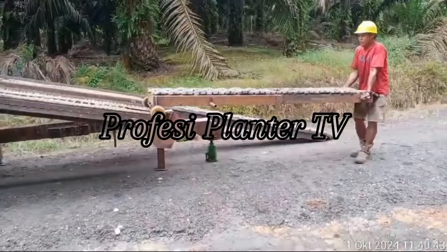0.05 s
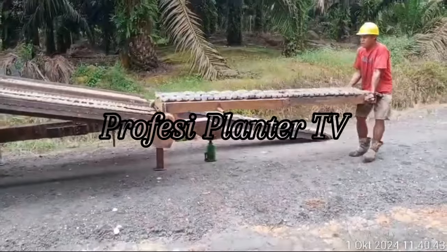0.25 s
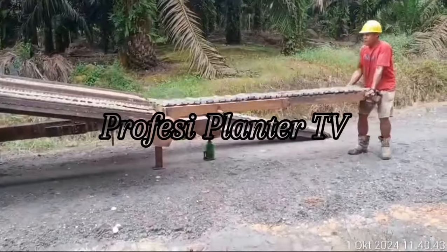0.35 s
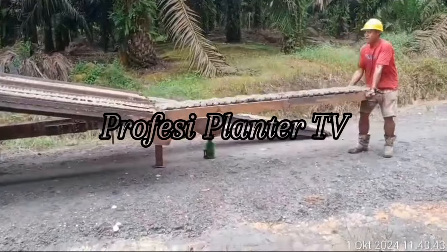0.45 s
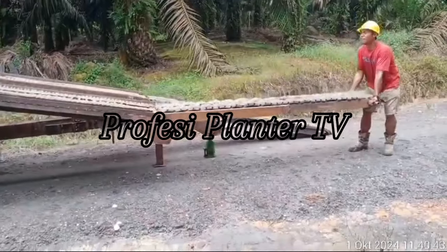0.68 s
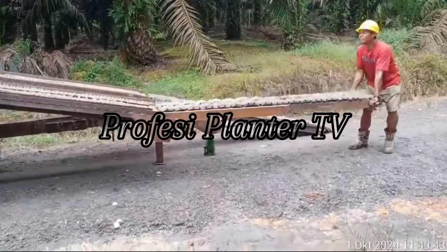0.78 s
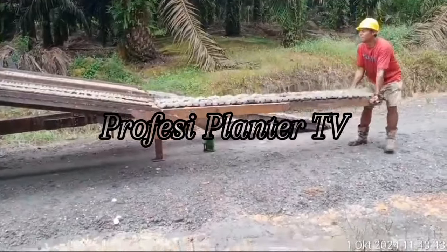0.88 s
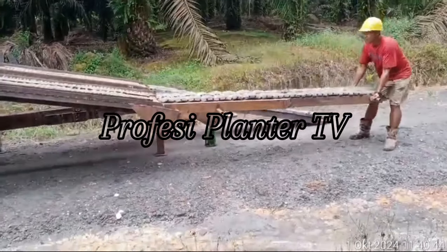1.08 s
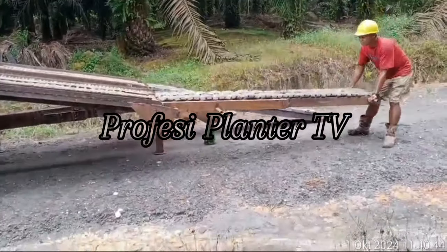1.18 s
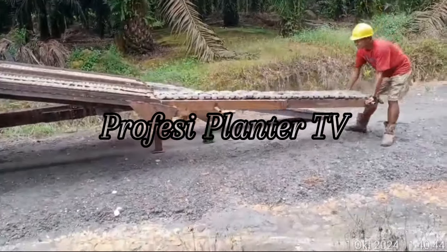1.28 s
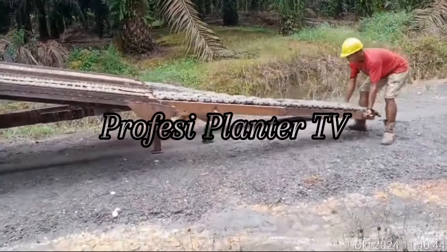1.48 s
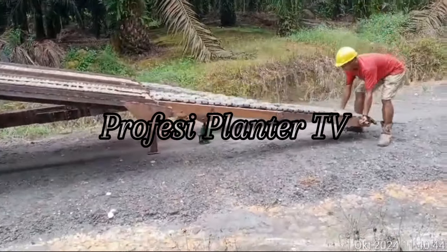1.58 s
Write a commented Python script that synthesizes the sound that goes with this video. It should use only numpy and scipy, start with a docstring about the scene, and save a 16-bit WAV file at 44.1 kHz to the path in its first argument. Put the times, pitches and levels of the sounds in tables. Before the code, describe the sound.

A steel ramp section drops, clattering and clanging with hollow knocks as it settles outdoors.

```python
"""A steel ramp section drops onto a loading ramp, bounces, chatters and settles with a hollow knock.
Each impact excites damped vibration: the heavy frame booms, the deck clangs, the contact crashes and
a box beam knocks. Friction grinds grit between the steel faces, and trees scatter the sound back.
Gravel ticks underfoot, a distant diesel engine pulses its exhaust and insects shrill in the open air."""
import sys
import numpy as np
from scipy import signal
from scipy.fft import rfft, irfft
from scipy.io import wavfile

SR = 44100
rng = np.random.default_rng(int(sys.argv[2]) if len(sys.argv) > 2 else 0)


def transcribe(signal):
    """Save signal, clipped to [-1, 1], as a 16-bit WAV file at the path in sys.argv[1]."""
    frames = np.atleast_2d(signal).T
    limited = np.clip(frames, -1, 1)
    pcm = np.round(limited * 32767).astype(np.int16)
    wavfile.write(sys.argv[1], SR, pcm)


N = 72765
T = np.arange(N) / SR


def undb(db):
    """Amplitude ratio of a level in decibels."""
    return 10 ** (np.asarray(db) / 20)


def unit(x):
    """Normalisation to rms 1."""
    return x / np.sqrt(np.mean(x ** 2) + 1e-18)


def noise():
    """Gaussian white noise."""
    return rng.standard_normal(N)


def colour(x, spectrum):
    """Spectral shaping by a curve (f/Hz, relative level/dB), normalised to rms 1."""
    hz, db = np.array(spectrum, float).T
    f = np.maximum(np.arange(N // 2 + 1) * SR / N, 1)
    gain = undb(np.interp(np.log(f), np.log(hz), db))
    return unit(irfft(rfft(x) * gain, N))


def fade(start, rise, t60):
    """Exponential damping after a linear rise: the level falls 60 dB in t60 seconds."""
    age = T - start
    attack = np.clip(age / max(rise, 1e-4), 0, 1)
    return attack * np.exp(-np.log(1000) * np.maximum(age - rise, 0) / t60)


def ring(start, hz, rise, t60):
    """Damped oscillation of a single mode."""
    return fade(start, rise, t60) * np.sin(2 * np.pi * hz * (T - start))


def through(x, response):
    """Convolution with an impulse response."""
    return signal.fftconvolve(x, response)[:N]


def flutter(hz):
    """Random modulation: noise of rms 1, low-passed at hz."""
    return colour(noise(), [(1, 0), (hz, 0), (2 * hz, -40), (SR / 2, -200)])


def chatter(contacts_per_s=700, spread_db=0.5, power_share=0.34):
    """Shot noise: random micro-contacts, each ringing briefly, over a smooth wash."""
    hits = (rng.random(N) < contacts_per_s / SR) * rng.choice([-1, 1], N)
    hits = hits * undb(spread_db * np.clip(noise(), -2, 2))
    contacts = unit(through(hits, noise() * fade(0, 0, t60=0.0053)))
    return np.sqrt(power_share) * contacts + np.sqrt(1 - power_share) * noise()


# spectrum of the open air (f/Hz, relative level/dB)
AIR_SPECTRUM = [(25, -25), (45, -15), (65, -3), (110, 3), (220, 3), (350, -5), (450, -6.5), (600, -4),
                (800, -8), (1600, -7.5), (3000, -13.5), (5700, -14.5), (6600, -18), (10000, -25.5),
                (14000, -32)]
# the recorder's gain on the background hiss (t/s, relative level/dB)
RECORDER_GAIN = [(0, 3), (.2, 3.5), (.9, -0.5), (1.3, 1), (1.65, -1)]


def air(level_db=-43.5):
    """Ambient noise: the hiss ducks under the crashes as the recorder's gain drops along a set curve."""
    gain_db = np.interp(T, *np.array(RECORDER_GAIN, float).T)
    return colour(noise(), AIR_SPECTRUM) * undb(level_db + gain_db)


# spectrum of the insect chorus (f/Hz, relative level/dB)
INSECT_SPECTRUM = [(6000, -26), (6900, -19.5), (7300, -3.5), (8000, 0.5), (8400, -8), (9000, -19),
                   (10500, -50), (13500, -37), (15000, -18.5), (16000, -26)]


def insects(level_db=-43.5, flutter_db=1.7):
    """Amplitude modulation: the chorus is a shrill band of noise with a fast flutter."""
    return colour(noise(), INSECT_SPECTRUM) * undb(level_db + flutter_db * flutter(hz=78))


# exhaust resonances (f/Hz, level/dB, t60/s)
EXHAUST_MODES = [(106, -29, .11), (160, -31, .06)]


def engine(firing_hz=18.87, weak_db=-0.5, spread_db=2.5, low_cut_hz=73.4):
    """Periodic excitation: uneven firings ring the exhaust, every second one weaker on average."""
    out = np.zeros(N)
    for k, deviation in enumerate(rng.standard_normal(34)):
        start = 0.027 + (k - 1) / firing_hz
        puff = sum(undb(db) * ring(start, hz, rise=0.0082, t60=t60) for hz, db, t60 in EXHAUST_MODES)
        out += undb(weak_db * (k % 2) + spread_db * deviation) * puff
    return signal.sosfilt(signal.butter(4, low_cut_hz, 'high', fs=SR, output='sos'), out)


# stones ticking underfoot (t/s, level/dB, centre f/Hz)
STONE_CLICKS = [(.878, -56, 11000), (.946, -43, 7600), (.968, -52, 11000), (1.005, -41.5, 11800),
                (1.242, -39, 1800), (1.305, -41, 7900), (1.36, -43, 640)]


def gravel():
    """Impact noise: colliding stones each give a short burst around their own pitch."""
    out = np.zeros(N)
    for start, db, hz in STONE_CLICKS:
        band = [(hz / 8, -40), (hz / 1.8, -20), (hz, 0), (2 * hz, -20), (8 * hz, -40)]
        out += undb(db) * fade(start, rise=0.0027, t60=0.033) * colour(chatter(), band)
    return out


def trees(x, echo_db=-12, corner_hz=2540):
    """Diffuse scattering: ground and trees return a dull, decaying echo."""
    dull_noise = colour(noise(), [(100, 0), (corner_hz, 0), (4 * corner_hz, -14)])
    response = dull_noise * fade(start=0.012, rise=0.0035, t60=0.59)
    return undb(echo_db) * np.std(x) * unit(through(x, response))


# slides of steel over grit (t/s, level/dB, length/s)
SLIDES = [(0, -36, 0.06), (0.04, -32, 0.045), (0.273, -20, 0.024), (0.406, -14.5, 0.018),
          (.764, -35.5, 0.0094), (0.787, -33, 0.015)]
# spectrum of the grinding grit (f/Hz, relative level/dB)
GRIT_SPECTRUM = [(500, 0), (2000, -1), (3500, -0.5), (5000, 7.5), (6500, 3), (8200, 5.5), (10000, -9),
                 (15500, -18)]


def scrapes():
    """Sliding friction: grit grinds between the faces; longer slides swell and fade more slowly."""
    envelope = sum(undb(db) * fade(start, rise=length / 3, t60=0.082 + 3 * length)
                   for start, db, length in SLIDES)
    return colour(chatter(), GRIT_SPECTRUM) * envelope


# hollow knocks of the box beam (t/s, level/dB, f/Hz)
BEAM_KNOCKS = [(.2115, -7, 573), (.224, -14, 613), (.345, -5.5, 630), (.347, -10, 431), (.361, -10.5, 688),
               (.807, -4, 619), (.821, -13, 689)]
# spectrum of their rough tail (f/Hz, relative level/dB)
TAIL_SPECTRUM = [(250, -35), (450, -9.5), (640, -0.5), (800, -11.5), (1050, -11), (1500, -22.5),
                 (3000, -60)]


def beam(rise=0.006, t60=0.055, overtone_ratio=1.68, overtone_db=-17, tail_db=-17):
    """Heavy damping: blunt contacts swell a hollow note and one overtone, leaving a noisy tail."""
    notes, tail_energy = np.zeros((2, N))
    for start, db, hz in BEAM_KNOCKS:
        overtone = undb(overtone_db) * ring(start, hz * overtone_ratio, rise, t60)
        notes += undb(db) * (ring(start, hz, rise, t60) + overtone)
        tail_energy += (undb(db + tail_db) * fade(start, 2 * rise, t60=0.23)) ** 2
    return notes + np.sqrt(tail_energy) * colour(noise(), TAIL_SPECTRUM)


# bright modes of the beam's walls (f/Hz, relative level/dB)
WALL_MODES = [(2290, -7), (3714, 1), (4180, -1.5), (4700, 1), (5125, 5.5), (5810, -3), (6584, -3),
              (8543, 1.5), (10450, -21)]


def beam_walls(gain_db=-27.5, roughness_rad=0.45):
    """Wall resonance: each knock excites brief high modes, roughened by phase modulation."""
    energy = sum((undb(db + gain_db) * fade(start, rise=0.0087, t60=0.067)) ** 2
                 for start, db, _ in BEAM_KNOCKS)
    tones = sum(undb(db) * np.sin(2 * np.pi * hz * T + roughness_rad * flutter(hz=190))
                for hz, db in WALL_MODES)
    return np.sqrt(energy) * tones


# blows of steel on steel (t/s, frame level/dB, deck level/dB, contact level/dB, rise/s)
IMPACTS = [(0.21, -19.5, -21.5, -13.5, 0.0057), (.236, -43, -15.5, -21.5, 0.0016),
           (0.273, -22, -21.5, -33.5, 0.0032), (0.306, -20, -26.5, -27.5, 0.0023),
           (0.339, -19.5, -22.5, -20, 0.006), (0.374, -23.5, -24.5, -25.5, .003),
           (0.408, -50, -29, -36, 0.0015), (0.448, -15, -14, -14.5, 0.0048), (.477, -36, -19, -23, 0.0011),
           (.498, -18, -24.5, -23, 0.0043), (.525, -21.5, -17, -24.5, 0.0059),
           (.553, -37, -17.5, -21, 0.0032), (.578, -24.5, -25, -26.5, 0.0025),
           (.603, -26.5, -29.5, -54, .003), (0.646, -39, -30, -31.5, 0.0024),
           (.671, -36, -55, -36.5, 0.0034), (0.812, -27, -28.5, -29.5, 0.0035)]
FRAME, DECK, CONTACT = range(3)


def vibration(part, t60):
    """Incoherent addition: a part's amplitude is the root of the blows' summed, decaying energies."""
    energy = sum((undb(levels[part]) * fade(start, rise, t60)) ** 2 for start, *levels, rise in IMPACTS)
    return np.sqrt(energy)


# lasting modes of frame and deck (f/Hz, relative level/dB, t60/s)
RAMP_MODES = [(92.8, -12, 2.4), (127, -2.5, 1.32), (160, -9, 1.3), (210.7, -1, 0.38), (264.6, -4.5, 0.47),
              (318.6, -5, 1.07), (551, -7.5, 0.35), (613, -1, 0.4), (710.4, -3, 0.51), (842, -13.5, 0.88),
              (1028, -22.5, 1.27), (1343, -7.5, 0.39), (1500, -1.5, 0.24), (1789, -17, 0.9),
              (1980, -17.5, 0.32), (2523, -10.5, 0.23), (3032, -10, 0.19), (4680, -12.5, 0.44),
              (5851, -36, 0.42)]


def ramp_modes(gain_db=-5.5, frame_top_hz=450, wander_rad=1):
    """Modal superposition: frame and deck ring on while the shifting contact nudges their pitch."""
    out = np.zeros(N)
    for hz, db, t60 in RAMP_MODES:
        part = DECK if hz > frame_top_hz else FRAME
        phase = 2 * np.pi * (hz * T + rng.random()) + wander_rad * flutter(hz=10.1)
        out += undb(gain_db + db) * vibration(part, t60) * np.sin(phase)
    return out


# spectrum of the crash at the contact (f/Hz, relative level/dB)
CRASH_SPECTRUM = [(400, -33), (1500, -13), (3200, -7.5), (5000, 0.5), (6500, -3.5), (8200, 0), (9800, -12),
                  (12500, -18), (15500, -26)]


def deck_partials(count=130, gain_db=-9.5, spread_db=6, t60=0.25):
    """Inharmonic plate vibration: each blow excites the same high partials with new random phases."""
    hz = 2000 + 11000 * rng.random(count)
    crash_db = np.interp(hz, *np.array(CRASH_SPECTRUM, float).T)
    weights = undb(crash_db + spread_db * np.clip(rng.standard_normal(count), -2, 1.5))
    out = np.zeros(N)
    for start, _, _, contact_db, rise in IMPACTS:
        lines = np.zeros(N // 2 + 1, complex)
        lines[(hz * N / SR).astype(int)] = weights * np.exp(2j * np.pi * rng.random(count))
        out += undb(contact_db + gain_db) * fade(start, rise, t60) * unit(irfft(lines, N))
    return out


# spectra of the frame's boom and the deck's clang (f/Hz, relative level/dB)
BOOM_SPECTRUM = [(25, -48), (45, -23), (70, -14), (115, -5), (210, 2), (300, -2), (420, -9), (700, -5),
                 (1500, -80)]
CLANG_SPECTRUM = [(200, -54), (420, -5), (650, -3), (950, -1), (1500, -3), (2400, -7.5), (3400, -12),
                  (6000, -15.5), (15000, -67)]


def ramp():
    """Impact excitation: every blow feeds three broad bands, and the higher ones decay faster."""
    boom = vibration(FRAME, t60=0.73) * colour(chatter(), BOOM_SPECTRUM)
    clang = vibration(DECK, t60=0.39) * colour(chatter(), CLANG_SPECTRUM)
    crash = vibration(CONTACT, t60=0.15) * colour(chatter(), CRASH_SPECTRUM)
    return boom + clang + crash


def scene():
    """Linear superposition: the steel, its echo and its resonances add to the background, in mono."""
    steel = ramp() + deck_partials() + scrapes()
    foreground = steel + trees(steel) + ramp_modes() + beam() + beam_walls()
    return (foreground + gravel() + engine() + insects() + air())[None]


def record(dry, ceiling=1.12, top_hz=15600):
    """Saturation and band limiting: the microphone rounds the loudest peaks and cuts the top."""
    rounded = ceiling * np.tanh(dry / ceiling)
    return signal.sosfilt(signal.ellip(10, 0.2, 80, top_hz, fs=SR, output="sos"), rounded)


dry = scene()
out = record(dry)
transcribe(out)
```